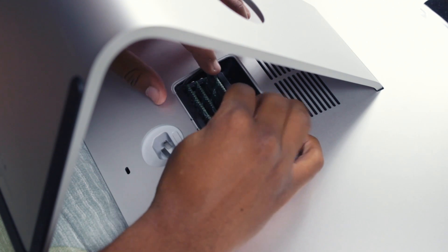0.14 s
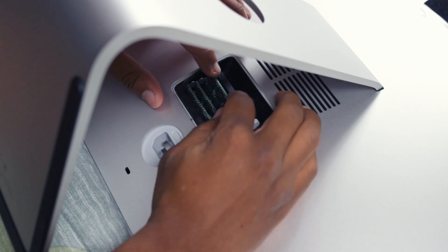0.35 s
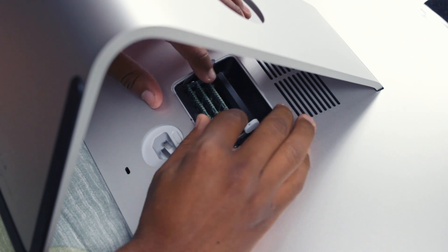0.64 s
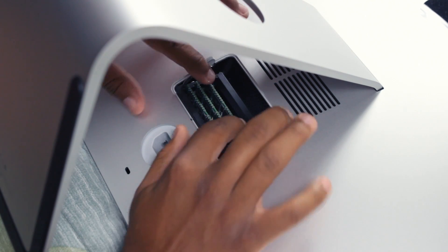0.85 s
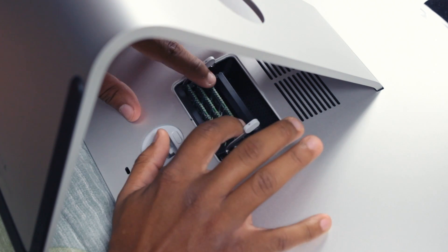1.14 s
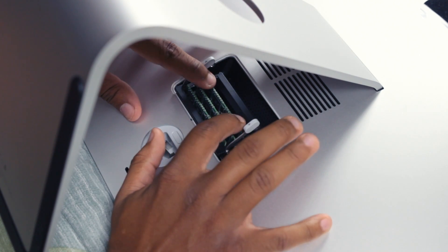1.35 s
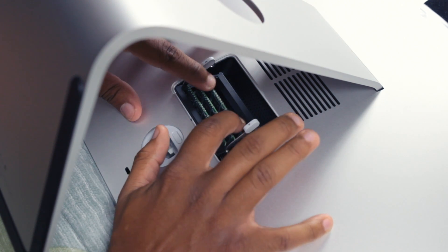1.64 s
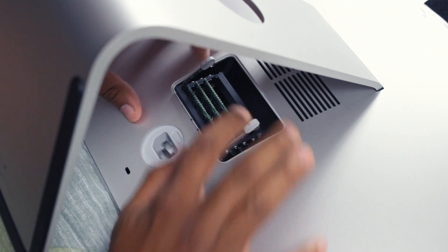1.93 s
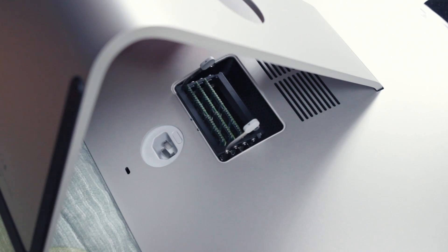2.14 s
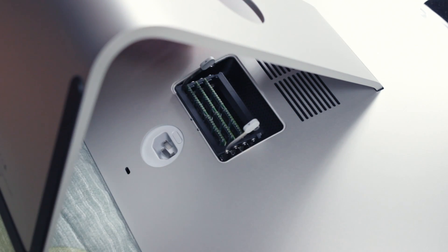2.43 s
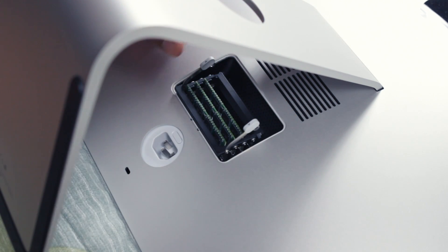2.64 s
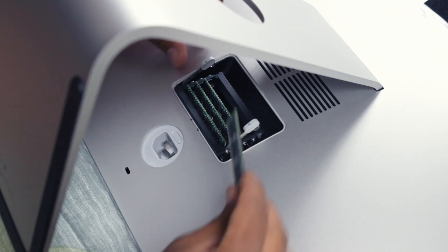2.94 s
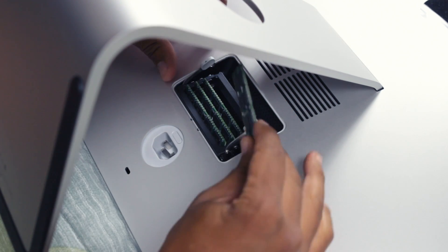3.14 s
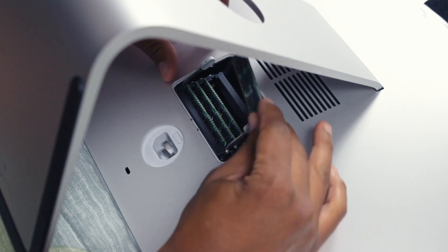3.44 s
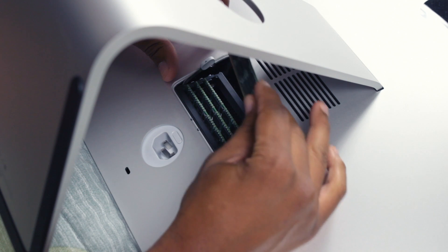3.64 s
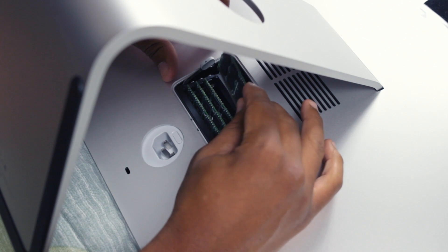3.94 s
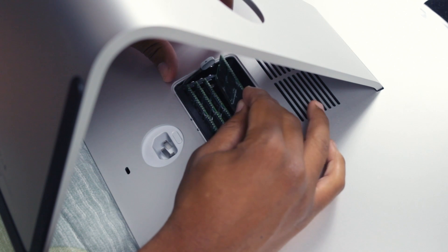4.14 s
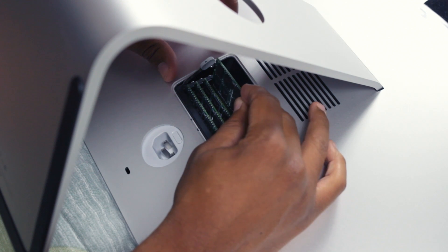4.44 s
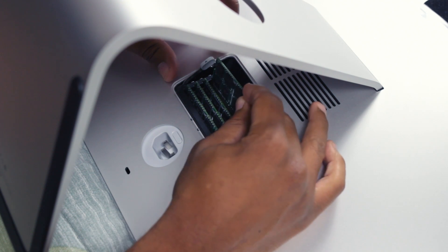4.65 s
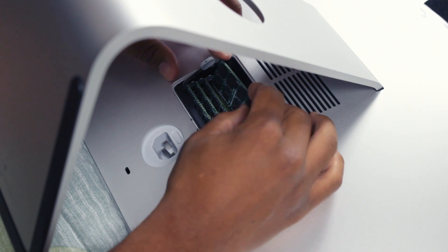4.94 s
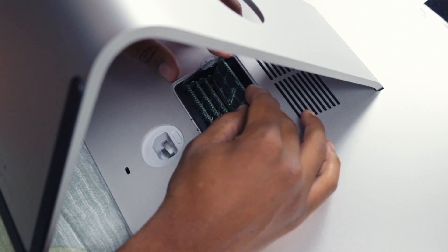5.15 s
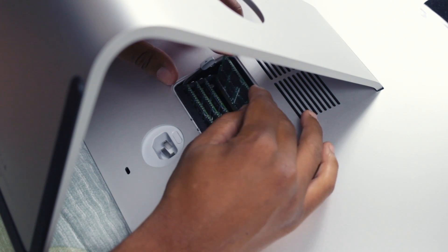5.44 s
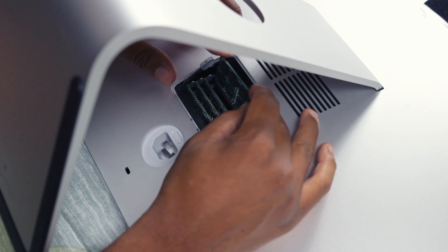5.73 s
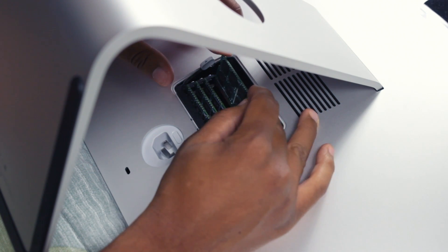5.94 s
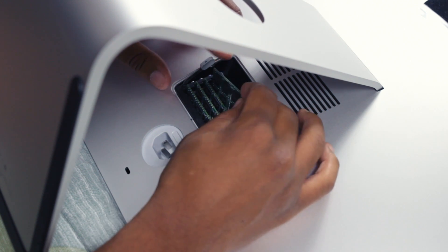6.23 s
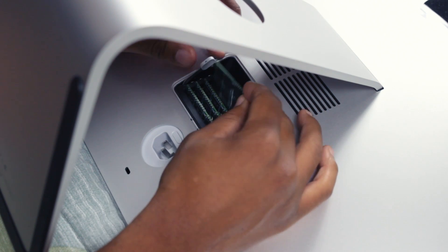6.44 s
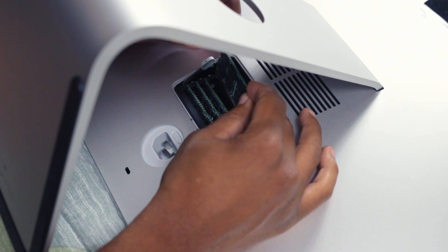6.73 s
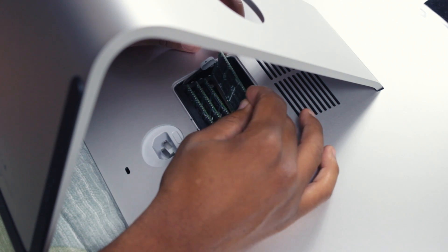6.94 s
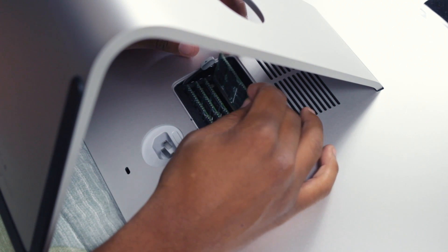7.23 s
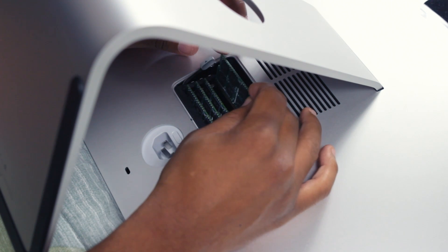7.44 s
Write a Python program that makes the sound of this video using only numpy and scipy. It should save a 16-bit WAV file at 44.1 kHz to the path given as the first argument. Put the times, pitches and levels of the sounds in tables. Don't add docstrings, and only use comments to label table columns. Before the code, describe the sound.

A memory board pops into its slot with a woody knock, then a lever latch snaps shut very loudly, followed by faint finger clicks and rattles.

```python
import sys
import numpy as np
from scipy import signal
from scipy.fft import rfft, irfft
from scipy.io import wavfile

SR = 44100
rng = np.random.default_rng(int(sys.argv[2]) if len(sys.argv) > 2 else 0)


def convert_level_to_amplitude(level_db):
    exponent = np.asarray(level_db, float) / 20
    return 10 ** exponent


def unload_audio(sound):
    columns = np.transpose(np.atleast_2d(sound))
    steps = np.round(np.clip(columns, -1, 1) * 32767)
    wavfile.write(sys.argv[1], SR, steps.astype(np.int16))


N = 334278

# (time [s], level [dB], rattle time [s])
LATCH_BLOWS = [
    (1.7601, -44, 0.00098),
    (1.762, 1.5, 0.00072),
    (1.7657, -19.5, 0.00074),
]
SNAP_S = LATCH_BLOWS[1][0]


def rms_one(x):
    return x / np.sqrt(np.mean(x ** 2) + 1e-20)


def level_curve(rows):
    return convert_level_to_amplitude(np.interp(np.arange(N) / SR, *np.transpose(rows)))


def bandpass(order, low_hz, high_hz, x):
    return signal.sosfilt(signal.butter(order, [low_hz, high_hz], "band", fs=SR, output="sos"), x)


def ring(force, hz, t60):
    decay = convert_level_to_amplitude(-60 / (t60 * SR))
    turn = 2 * np.pi * hz / SR
    return signal.lfilter([0, np.sin(turn)], [1, -2 * decay * np.cos(turn), decay ** 2], force + 1e-18)


def ring_modes(forces, hz, mode_db, t60):
    return sum(convert_level_to_amplitude(mode_db[k]) * ring(forces[k], hz[k], t60[k]) for k in range(len(hz)))


def chatter(seconds, noise):
    age = np.arange(len(noise)) / SR / seconds
    force = noise * age * np.exp(-age)
    return force / np.sqrt(np.sum(force ** 2))


def evened(force, hz):
    turns = np.exp(-2j * np.pi * np.outer(hz, np.arange(len(force))) / SR)
    return 1 / np.maximum(np.abs(turns @ force), 0.5)


def add(track, s, piece):
    i = max(round(s * SR), 0)
    track[..., i:i + piece.shape[-1]] += piece[..., :N - i]


def click(s, db):
    out = np.zeros(N)
    add(out, s, np.array([convert_level_to_amplitude(db)]))
    return out


def hiss():
    # (frequency [Hz], density [dB per Hz])
    colour = [(20, -31), (35, -7), (60, -8), (110, -3), (160, -8.5), (300, -5.5), (600, -7.5), (1200, -9.5),
              (2500, -12), (5000, -15.5), (9000, -20), (13000, -20.5), (15800, -19)]
    white = rfft(rng.standard_normal(N))
    hz = np.maximum(np.arange(len(white)) * SR / N, 1)
    colour_hz, colour_db = np.transpose(colour)
    gain = convert_level_to_amplitude(np.interp(np.log(hz), np.log(colour_hz), colour_db))
    gain = gain * (hz > 12) * (hz < 15830)
    return convert_level_to_amplitude(-55.5) * rms_one(irfft(white * gain, N))


def desk_rumble():
    # (time [s], level [dB])
    leaning = [
        (0.0, -73),
        (1.54, -87),
        (1.79, -73),
        (4.85, -92),
        (5.15, -69),
        (7.01, -77),
        (7.58, -69),
    ]
    deep = bandpass(2, 18, 45, rng.standard_normal(N + SR))[SR:]
    return level_curve(leaning) * rms_one(deep)


def room_tail(x):
    # (centre [Hz], level [dB], t60 [s])
    bands = [(172, -5.5, 0.2), (433, -11.5, 0.31), (1160, -11.5, 0.29), (2520, -15.5, 0.49),
             (5100, -18, 0.3), (11900, -17, .12)]
    t = np.arange(SR // 2) / SR
    build_up = 1 - np.exp(-(t / 0.0032) ** 2)
    tail = np.zeros(len(t))
    for hz, db, t60 in bands:
        white = rng.standard_normal(len(t))
        band = bandpass(2, hz / 1.43, min(hz * 1.9, 0.45 * SR), white)
        dying = band * convert_level_to_amplitude(-60 * t / t60) * build_up
        tail += convert_level_to_amplitude(db) * dying / np.sqrt(SR * t60 / 14)
    return signal.fftconvolve(x, tail)[:N]


def notes():
    # (time [s], peak [dB], pitch [Hz], t60 [s])
    touches = [(0.005, -30, 390, 0.083), (0.15, -30, 390, 0.2), (1.536, -33, 352, 0.05),
               (1.549, -22, 191, 0.081), (3.404, -40, 300, 0.07), (3.617, -36, 590, 0.12),
               (3.73, -36, 250, 0.47), (3.769, -41.5, 470, 0.14), (4.262, -27, 1100, 0.09),
               (4.413, -18.5, 1340, 0.071), (4.468, -22.5, 390, 0.074), (4.549, -33.5, 630, 0.11),
               (4.604, -28, 675, 0.067), (4.918, -30.5, 308, 0.08), (5.411, -27, 318, 0.11),
               (6.032, -23.5, 390, 0.081), (6.139, -27, 1056, 0.076), (6.236, -16, 617, 0.13),
               (6.555, -24, 990, 0.036), (6.784, -37, 1060, 0.074), (6.867, -29, 919, 0.21),
               (0.598, -5, 621, 0.071), (6.981, -35, 890, 0.12), (7.248, -30, 649, 0.11),
               (7.379, -27, 1073, 0.073), (7.544, -30.5, 310, 0.15)]
    # (time [s], peak [dB])
    thuds = [(0.176, -44), (0.602, -32), (0.836, -46), (1.042, -43), (2.029, -42), (4.433, -38),
             (4.603, -50), (5.425, -36), (6.248, -29.5), (6.358, -45), (6.599, -37), (6.877, -40),
             (7.037, -34.5), (7.259, -36)]
    out = np.zeros(N)
    thud_hz, thud_t60_s = 193.5, 0.27
    for s, db, hz, t60 in touches + [(s, db, thud_hz, thud_t60_s) for s, db in thuds]:
        touch = chatter(0.0025, rng.standard_normal(8192))
        add(out, s, convert_level_to_amplitude(db - 11.5) * ring(touch * evened(touch, [hz]), hz, t60))
    return out


def ticks():
    # (time [s], peak [dB], pitch [Hz], grit [dB])
    contacts = [(0.263, -41.5, 1740, -15), (0.5803, -32, 1600, -16), (0.5908, -25, 1970, -16),
                (0.5974, -24, 1500, -21), (0.6024, -32, 2920, -16), (0.6154, -29, 1730, -14),
                (1.9714, -33, 1740, -22), (1.9847, -35, 2680, -24), (2.1424, -42, 1670, -19),
                (2.165, -32, 1550, -23), (2.5714, -41.5, 1500, -12), (2.5814, -44, 1780, -10),
                (4.2627, -44, 3300, -24), (4.4695, -37, 2700, -24), (4.6057, -31, 2390, -29),
                (5.4108, -33.5, 3640, -7.5), (5.4137, -29, 2620, -30), (5.4515, -39, 2060, -21),
                (6.0332, -34.5, 2100, -30), (6.2357, -22.5, 1670, -30), (6.2564, -35, 2570, -15),
                (6.8683, -32, 3455, -34), (7.3791, -43.5, 3600, -20.5), (1.539, -38.5, 2500, -22),
                (4.413, -43, 2900, -25), (4.553, -45, 2600, -25), (6.362, -41.5, 3700, -13.5),
                (6.522, -39, 2570, -18), (6.996, -43, 3650, -25), (0.002, -32, 2560, -14.5)]
    out = np.zeros(N)
    for s, db, hz, grit_db in contacts:
        touch, grit, air = rng.standard_normal((3, 2048))
        contact = chatter(0.0011, touch)
        tone = convert_level_to_amplitude(-1) * ring(contact * evened(contact, [hz]), hz, 0.011)
        spray = convert_level_to_amplitude(grit_db + 26.5) * bandpass(2, 3800, 8200, chatter(0.0033, grit))
        airy = convert_level_to_amplitude(1.14 * grit_db + 26.5) * bandpass(3, 10500, 15700, chatter(0.0011, air))
        add(out, s, convert_level_to_amplitude(db - 0.5) * (tone + spray + airy))
    return out


def finger_rub():
    # (time [s], level [dB])
    pressure = [(0.0, -45), (0.34, -52.5), (1.39, -59), (1.65, -62.5), (1.92, -40.5), (2.24, -57.5),
                (2.51, -68), (3.4, -71), (3.61, -64), (4.31, -56), (4.65, -62), (5.87, -51.5), (6.08, -47),
                (6.23, -42), (6.69, -67), (7.58, -59)]
    grains = (rng.random(N) < 400 / SR) * rng.standard_normal(N)
    grains = grains * convert_level_to_amplitude(4.3 * rng.exponential(1, N).clip(0, 4))
    soft = signal.lfilter([0.08], [1, -0.92], rms_one(grains))
    return convert_level_to_amplitude(-41.5) * level_curve(pressure) * soft


def knocks():
    # (frequency [Hz], level [dB], t60 [s])
    case = [(179.7, -11, 0.11), (223, -10, 0.048), (304.8, -1.5, 0.1), (390, -4, 0.13), (472.5, 1.5, 0.069),
            (532, -15, 0.058), (626, 6, 0.082), (699, 1.2, 0.078), (783, 1, 0.054), (942, -4.5, 0.11),
            (1051, 7.5, 0.028), (1252, -3, 0.075), (1340, -6, 0.077), (1431, 0.5, 0.045), (1697, 2, 0.027),
            (1950, 5.5, 0.018), (2162, -5, 0.099), (2400, -18, 0.036), (2637, 6.5, 0.011),
            (2990, -3, 0.061), (3370, -1, 0.021), (3570, 5, 0.0072), (4090, 0, 0.013), (5040, -3, 0.0067)]
    anchor_hz = [280, 650, 1400, 3000]
    # (time [s], peak [dB], low-mode weight [dB], brightness [dB])
    hard = [(0.001, -34, 3, -6.5), (0.152, -35.5, -12, -22), (1.539, -29.5, 1.5, -23),
            (2.01, -50.5, 9.5, 11), (3.404, -44, 6, -22), (3.618, -50, 4, -11), (4.265, -32, -9, -7),
            (4.32, -36.5, -30, -15), (4.431, -41.5, 9, -12), (4.47, -26, -20, -14),
            (4.604, -30.5, -1.5, -14), (4.918, -44, 3, -16), (5.414, -32, -5, -3), (5.452, -37, -11, -19),
            (5.492, -41, 0, -15), (6.035, -28.5, -12.5, -8), (6.234, -29.5, -2, -2), (6.259, -32.5, 3.5, 3),
            (6.354, -31, -3.5, -8), (6.519, -38.5, -19, -5), (6.869, -32.5, -5, -0.5), (6.889, -42, 4, -3),
            (7.035, -43, -1, 3), (7.084, -42, -17, -25), (7.25, -31.5, -21, -15), (7.272, -34, -17, -11),
            (7.382, -35, -3.5, -7), (7.542, -39, -3, -9), (6.284, -38, -6, -12), (7.232, -44, -5, -10)]
    # (time [s], peak [dB], low-mode weight [dB], brightness [dB])
    pop = [
        (0.571, -42, 6, -7),
        (0.585, -17.5, -4.5, -15.5),
        (0.589, -30.5, -18, 3),
        (0.598, -17.5, -23, -15.5),
        (0.602, -23, -6, -20),
        (0.615, -33, -17, 5),
        (0.637, -33, -8, -9),
    ]
    # (time [s], peak [dB], low-mode weight [dB], brightness [dB])
    scuffs = [(0.024, -42.5, 9, -24), (0.082, -51, 9, -21), (0.174, -44, 5, -28), (0.315, -40.5, -9, -19),
              (0.343, -45, -9, -23), (1.018, -56, -4, 10.5), (1.983, -43.5, -1, -6),
              (2.239, -48.5, -17, -1), (2.573, -48, -21, -2), (3.514, -49, 5, -9), (3.732, -47.5, 1, -20),
              (4.407, -27.5, -24, -18), (4.495, -50, 4, -12), (4.554, -41.5, -20, -17),
              (4.883, -47, -9, -21), (4.984, -44.5, 4.5, -6), (5.03, -47, 3, -11), (5.396, -37, -3, -14),
              (5.525, -45.5, 0, -6), (5.625, -45, -11, -10), (6.535, -37, -7, -4.5), (5.831, -46, -2, -13),
              (6.138, -31, -18, -7.5), (6.365, -35.5, 2, -2), (6.403, -33.5, -13, -11.5),
              (6.562, -34, -10, -10), (6.589, -51, 12, -2), (6.783, -47, -20, -1.5),
              (6.983, -44.5, -19, -2), (7.004, -40.5, -16, -3)]
    hz, mode_db, t60 = np.transpose(case)
    force = np.zeros((len(hz), N))
    # events, chatter time [s], level of the highest modes [dB]
    for events, seconds, top_db in [(hard, 0.002, -13.5), (pop, 0.0017, -7.5), (scuffs, 0.007, -15)]:
        for s, db, low, bright in events:
            high = top_db + 0.43 * bright
            tilt = np.interp(np.log(hz), np.log(anchor_hz), [low + 8, 0, bright + 6, high + 5])
            spot_db = 3.44 * rng.standard_normal(len(hz))
            noise = rng.standard_normal(2560)
            sign = np.sign(noise[-len(hz):])
            contact = chatter(seconds, noise)
            strength = convert_level_to_amplitude(db - 12.5 + tilt + spot_db) * sign
            add(force, s - 0.002, np.outer(strength * evened(contact, hz), contact))
    force += finger_rub()
    return ring_modes(force, hz, mode_db, t60)


def crack():
    paths = [.00016, .00039, .00066, .00107]
    out = click(SNAP_S, 4)
    for lag in (np.array(paths) * SR).astype(int):
        loop = np.r_[1, np.zeros(lag - 1), -0.55]
        out = signal.lfilter(loop[::-1], loop, out + 1e-18)
    return bandpass(1, 900, 11000, out)


def latch():
    # (frequency [Hz], level [dB], t60 [s])
    lever = [(181.6, -24.5, 0.13), (305, -23, 0.12), (392, -22, 0.056), (607, -22.5, 0.067),
             (774, -11.5, 0.033), (935, -25.5, 0.076), (1535, -8.5, 0.02), (1740, -5, 0.013),
             (2060, -12, 0.013), (2720, -9, 0.022), (3130, -11.5, 0.016), (3580, -11, 0.02),
             (4000, -8, 0.009), (4700, -11, 0.0027), (6050, -13.5, 0.015), (6300, -26, 0.02),
             (7400, -18, 0.0069), (8430, -17, 0.013), (11340, -12, 0.0035), (12800, -19, 0.003)]
    # (frequency [Hz], level [dB], t60 [s])
    spring = [(1543, -38, 0.48), (1670, -31, 0.23), (1710, -46, 0.4), (1780, -45, 0.34), (1880, -39.5, .35)]
    hz, mode_db, t60 = np.transpose(lever + spring)
    force = np.zeros((len(hz), N))
    for s, db, seconds in LATCH_BLOWS:
        for k in range(len(hz)):
            blow = chatter(seconds, rng.standard_normal(512))
            add(force[k], s, convert_level_to_amplitude(db) * blow * evened(blow, [hz[k]]))
    return ring_modes(force, hz, mode_db, t60)


def scene():
    ringing = latch()
    handling = knocks() + ticks() + notes()
    all_round = signal.sosfilt(signal.butter(2, 1900, fs=SR, output="sos"), ringing)
    spread = bandpass(2, 1300, 7800, click(SNAP_S, 22.5))
    tail = room_tail(convert_level_to_amplitude(5.5) * handling + convert_level_to_amplitude(2.5) * all_round + spread)
    contacts = bandpass(6, 155, 15900, handling + ringing + crack() + tail)
    return (contacts + hiss() + desk_rumble())[None]


def top_cut(x):
    return signal.sosfilt(signal.butter(12, 16420, fs=SR, output="sos"), x)


def record(dry):
    mix = np.clip(dry + 0.001, -1, 1)
    return top_cut(mix)


dry = scene()
out = record(dry)
unload_audio(out)
```